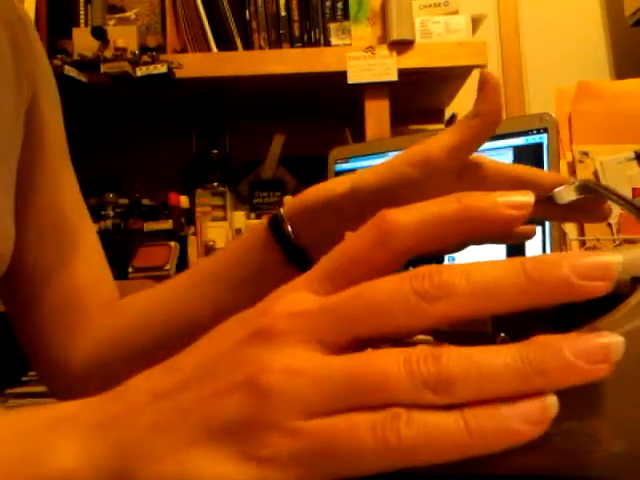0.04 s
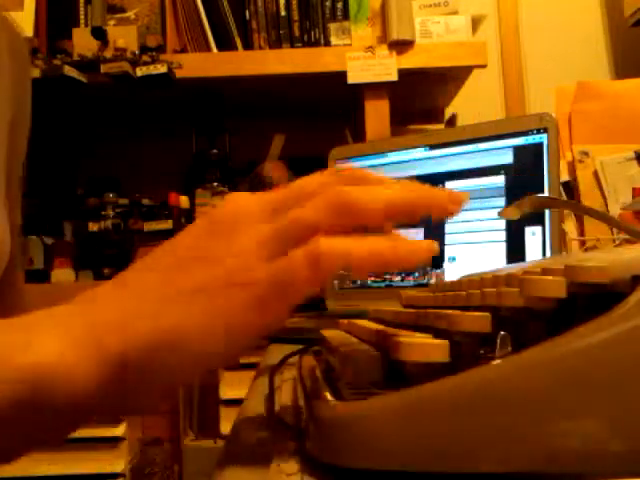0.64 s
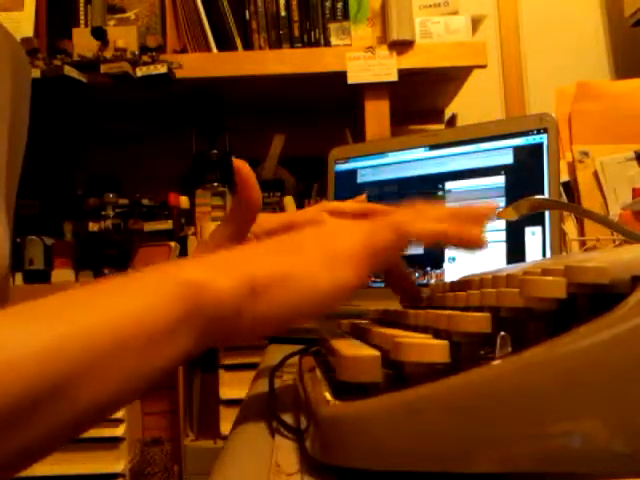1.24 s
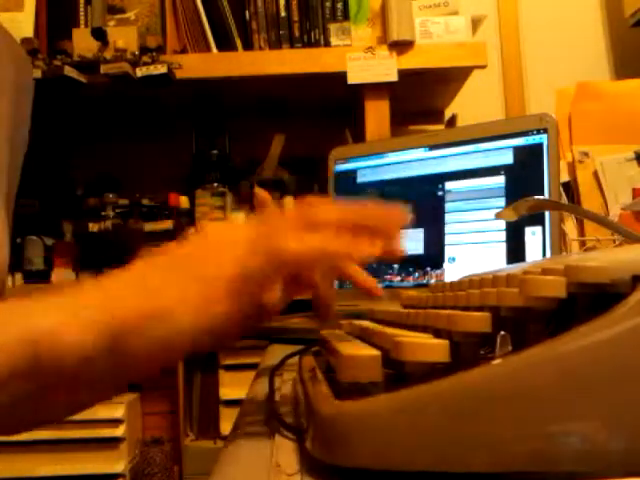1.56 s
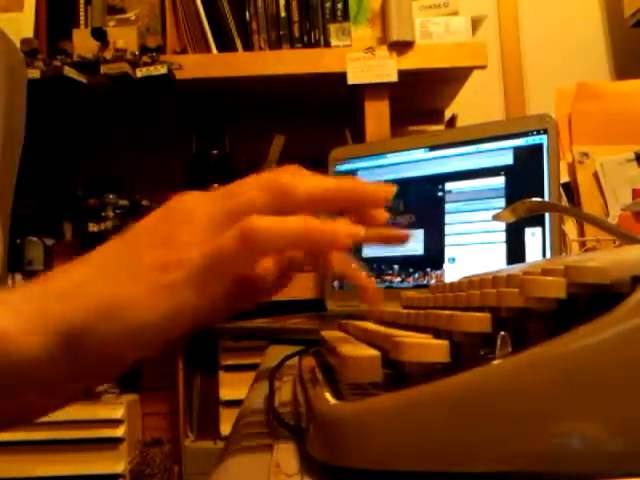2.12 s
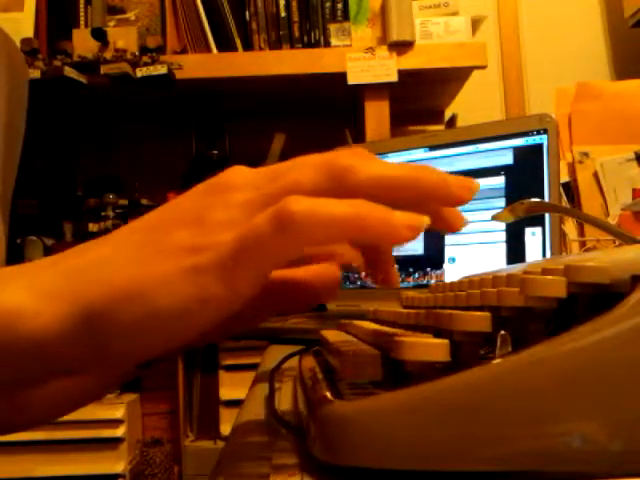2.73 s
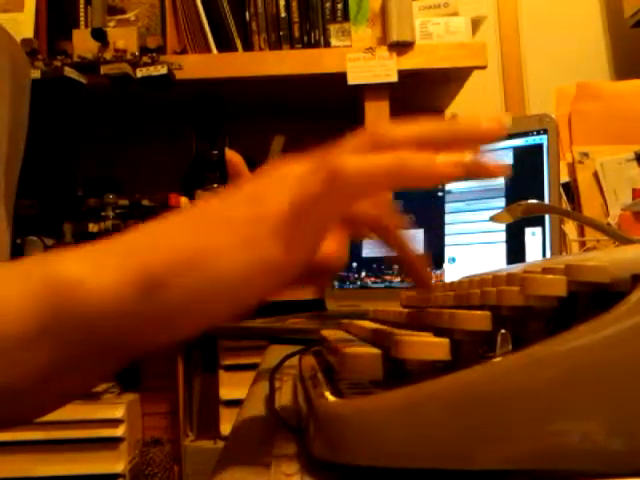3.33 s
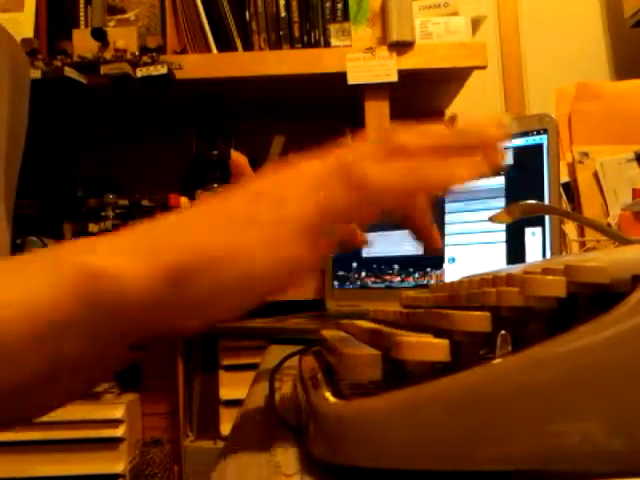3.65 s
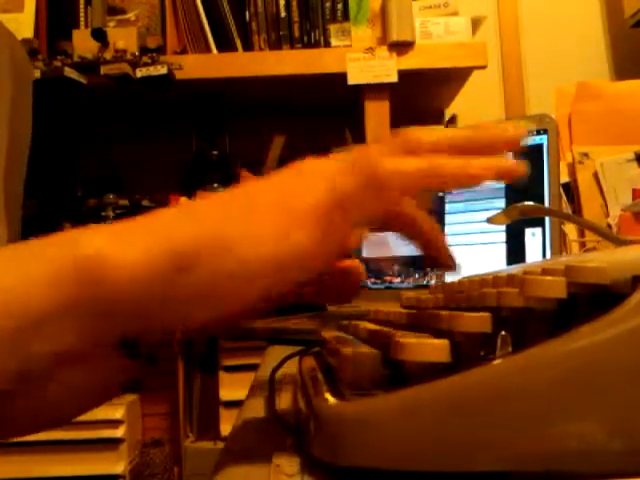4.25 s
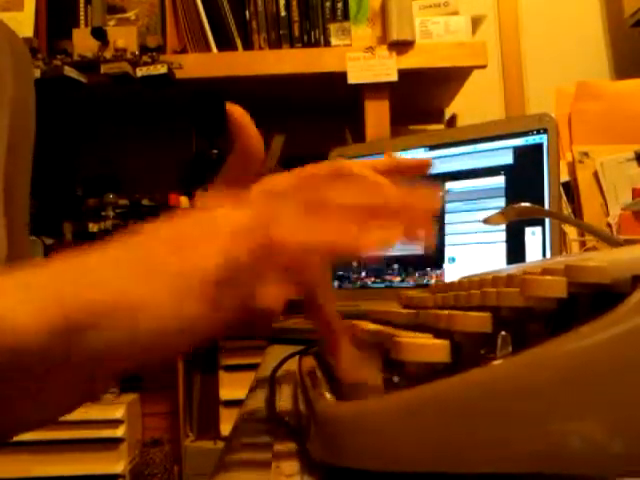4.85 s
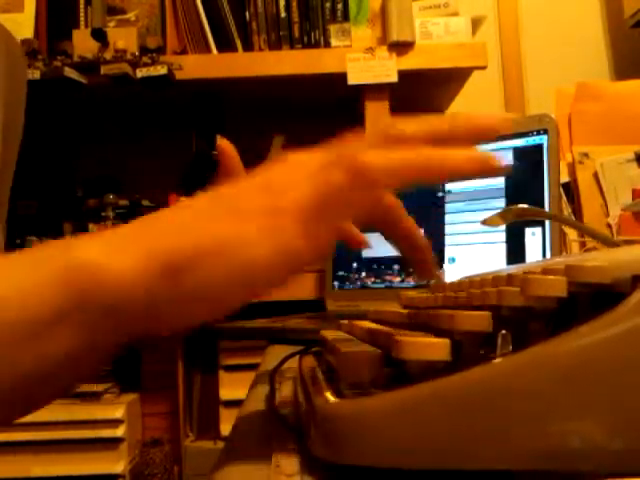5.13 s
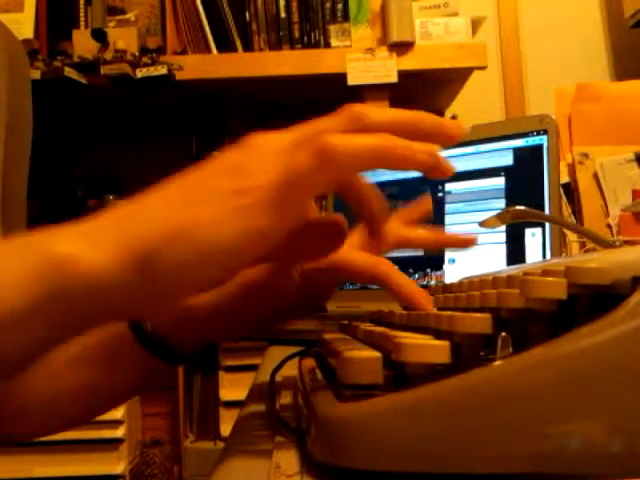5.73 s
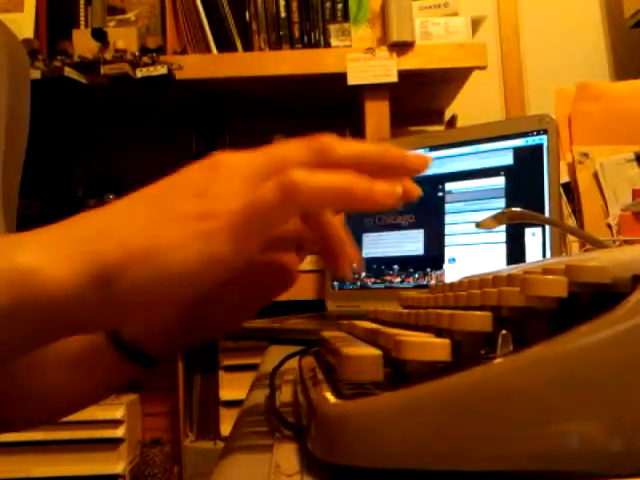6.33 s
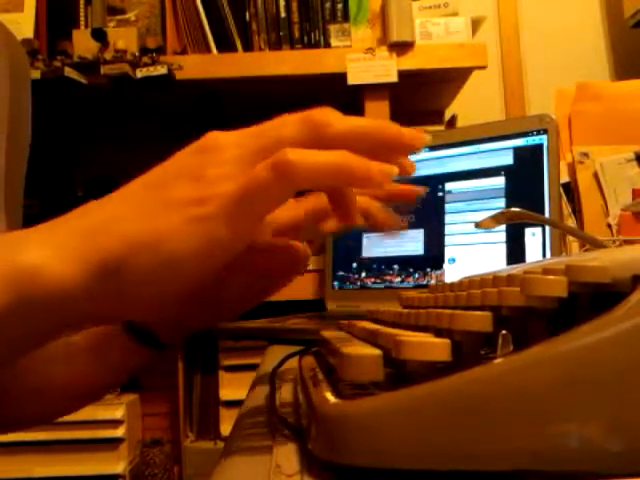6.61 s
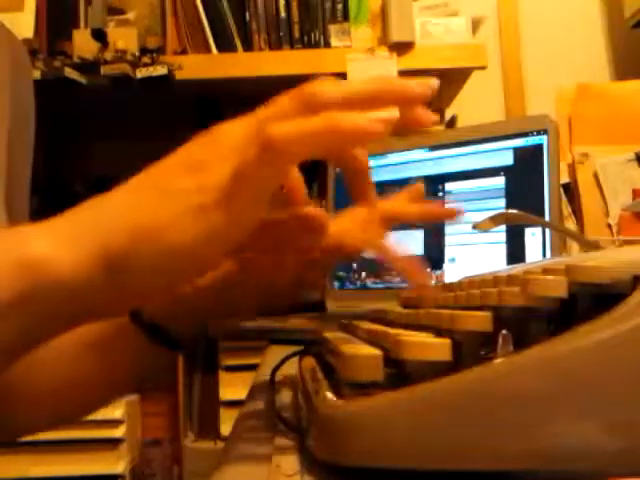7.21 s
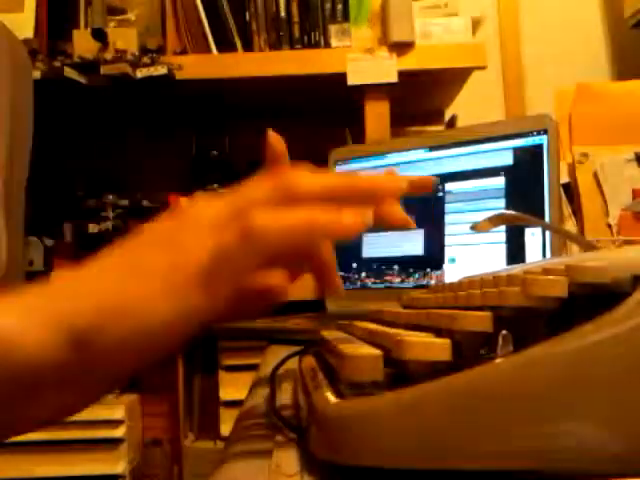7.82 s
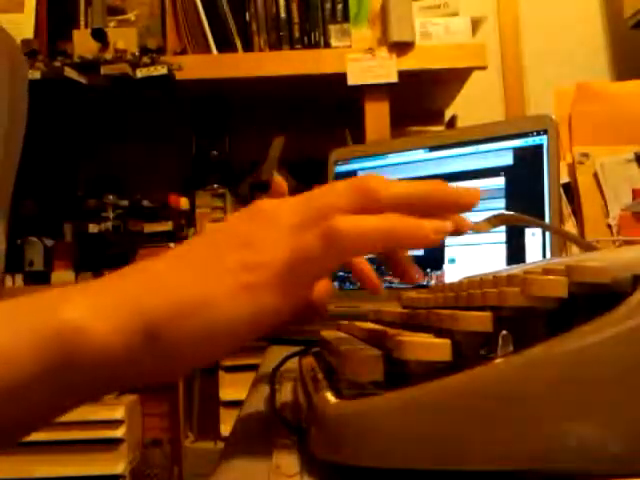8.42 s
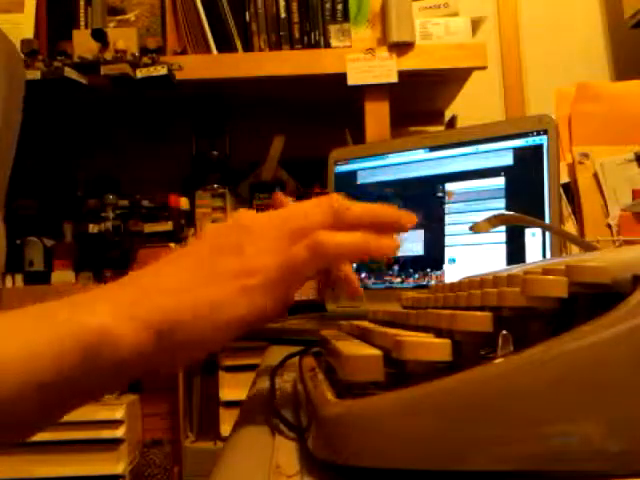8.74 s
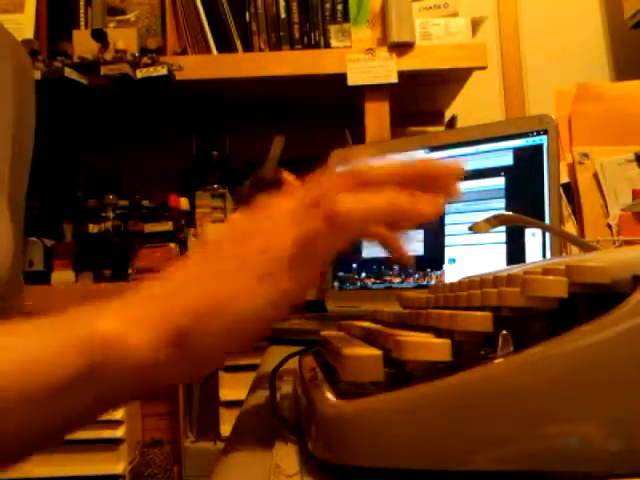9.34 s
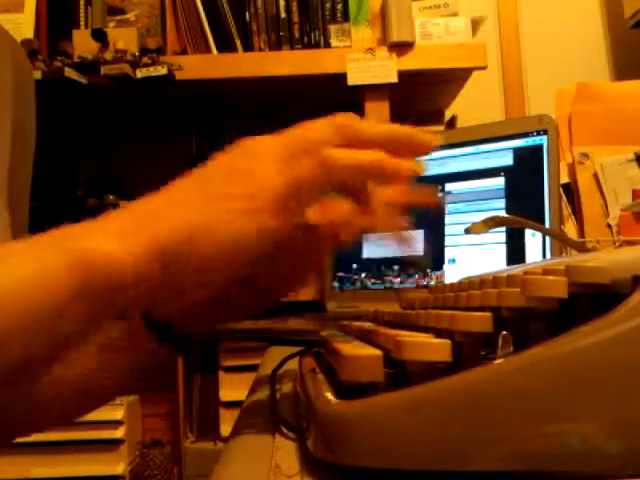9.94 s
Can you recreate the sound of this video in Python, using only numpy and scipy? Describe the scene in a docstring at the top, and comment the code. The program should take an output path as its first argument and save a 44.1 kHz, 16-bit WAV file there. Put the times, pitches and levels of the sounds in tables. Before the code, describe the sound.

Close typing on a manual typewriter: sharp metallic slaps, rattling keys and soft desk thuds, broken by short pauses.

```python
"""Manual typewriter on a desk, close up.

Bursts of typing in a small room. Per letter: the key rattles the linkage, the typebar slaps the platen
and rings the frame, then drops back on its rest. The space bar knocks and trips the escapement.
The desk thuds below, over steady rumble and hiss. The loudest slaps clip."""
import sys
import numpy as np
from scipy import signal
from scipy.fft import rfft, irfft
from scipy.io import wavfile

SR = 44100
rng = np.random.default_rng(int(sys.argv[2]) if len(sys.argv) > 2 else 0)


def store_wav(level_fs):
    """Save 16-bit WAV to argv[1]."""
    pcm = np.round(np.clip(np.atleast_2d(level_fs), -1, 1) * 32767)
    wavfile.write(sys.argv[1], SR, pcm.T.astype(np.int16))


N = 439655
T = np.arange(SR // 2) / SR  # time since contact, s

# space bar strokes: trip_s, trip_db, release_s, thump_hz
SPACES = [(1.6394, -9.5, 1.7305, 91.5), (2.2785, -8, 2.38, 142), (4.805, -7.5, 4.896, 69),
          (5.553, -9, 5.654, 151), (6.178, -8, 6.279, 218), (7.958, -7.5, 8.056, 63.2)]
# hands nudging the carriage: start_s, level_db
NUDGES = [(0.1995, -22), (0.3773, -13), (0.401, -16), (0.4577, -22)]
# tones of springs and steel bars: pitch_hz, level_db
STEEL_MODES = [(2708, -50), (4264, -37), (5867, -32), (6855, -51), (7267, -34.5), (7729, -36.5),
               (8374, -31)]
# spectrum of parts falling back to rest: freq_hz, level_db
RETURN_SPECTRUM = [(200, -3.5), (500, -14), (950, -2), (2800, -8.5), (4200, -11.5), (7300, -8.5),
                   (10000, -12), (14500, -23.5)]


def slaps(strikes, level_db=3, lag_s=0.0011, t60_s=0.045, bounce_s=0.011, bounce_db=-9):
    """Type hits the platen: a hard crack and two small bounces."""
    # crack spectrum: freq_hz, level_db
    spectrum = [(450, -14.5), (1000, -6.5), (1900, -9), (2900, 0), (3600, -3.5), (4400, 1), (5100, -6),
                (7300, 2), (9500, -5), (14500, -20)]
    out = np.zeros((2, N))
    bounces = amp(bounce_db) * np.hypot(fade(0.048, bounce_s), 0.5 * fade(0.048, 2 * bounce_s))
    envelope = np.hypot(fade(t60_s), bounces)
    for s, db in strikes:
        add(out, s + lag_s, amp(db + level_db) * envelope * noise())
    return colour(out, spectrum)


def frame(strikes, wash_db=-6, wash_t60_s=0.34, tones_db=-12, tones_t60_s=0.15, rise_s=0.00088):
    """The struck frame rings: a wash of dense modes plus a few clear steel tones."""
    # dense frame modes: freq_hz, level_db
    spectrum = [(240, -31.5), (400, -11.5), (1880, -10), (2700, -3), (3830, -6), (4390, -1.5), (5190, -5.5),
                (7470, 2), (13500, -14), (15000, -38)]
    wash, tones = np.zeros((2, 2, N))
    ring = noise() * fade(wash_t60_s)
    hz, mode_db = np.transpose(STEEL_MODES)
    modes = phasors(hz) * fade(tones_t60_s)
    weight = amp(mode_db) / np.linalg.norm(amp(mode_db))
    for s, db in strikes:
        onset = amp(db) * attack(rise_s)
        add(wash, s, onset * ring)
        re, im = rng.standard_normal((2, 2, len(hz)))
        add(tones, s, onset * (((re + 1j * im) * weight) @ modes).real)
    return amp(wash_db) * colour(wash, spectrum) + amp(tones_db) * tones


def keys(presses, level_db=-3.5, rise_s=0.0073, swing_db=-5.5, swing_s=0.036):
    """Levers take up slack, then clatter again as the bar pushes the ribbon lift."""
    # linkage spectrum: freq_hz, level_db
    spectrum = [(180, -35), (300, -11), (507, -11), (1150, -1), (1650, -7), (2400, -2.5), (3170, -6.5),
                (6840, -0.5), (13200, -7.5), (15000, -18.5)]
    out = np.zeros((2, N))
    take_up = fade(0.14) * attack(rise_s)
    push = np.hypot(take_up, amp(swing_db) * fade(0.079, swing_s))
    for s, db in presses:
        links = rattle(per_s=1100, t60_s=0.011, spread_db=2)
        add(out, s, amp(db + level_db) * push * links * noise())
    return shell_ring(colour(out, spectrum))


def shell_ring(x, ring_db=-7, t60_s=0.04):
    """Contacts plus the dense modes they ring in levers and shell."""
    return x + amp(ring_db) * convolve(x, noise() * fade(t60_s) * attack(0.00063))


def bar_returns(landings, knock_db=3, t60_s=0.024, rise_s=0.0014, clatter_db=-12, lead_s=0.0055):
    """Links catch and chatter; the bar lands on its padded rest, a hollow knock near its own pitch."""
    # typebar rest modes: pitch_hz, level_db
    rest_modes = [(830, -9), (1010, -2.5), (1180, -9), (1350, -3.5), (1660, -2), (1796, 1.5), (2150, -6)]
    hz, mode_db = np.transpose(rest_modes)
    knocks, clatter = np.zeros((2, 2, N))
    envelope = fade(t60_s) * (1 - np.exp(-(T / rise_s) ** 2))
    stereo_norm = np.sqrt(2) * np.linalg.norm(fade(t60_s))
    shake = np.hypot(amp(-1) * fade(0.045), fade(0.1, lead_s))
    for s, db, bar_hz in landings:
        weight = amp(mode_db) / (1 + (np.log(hz / bar_hz) / 0.58) ** 2)
        pitch_hz = hz * (1 + 0.02 * rng.standard_normal(len(hz)))
        phase = rng.uniform(0, 2 * np.pi, len(hz)) + 0.5 * rng.standard_normal((2, len(hz)))
        knock = ((weight * np.exp(1j * phase)) @ (envelope * phasors(pitch_hz))).real
        add(knocks, s, amp(db + knock_db) * stereo_norm * knock / np.linalg.norm(knock))
        links = rattle(per_s=990, t60_s=0.015, spread_db=3)
        add(clatter, s - lead_s, amp(clatter_db) * shake * links * noise())  # same level for every bar
    return knocks + colour(clatter, RETURN_SPECTRUM)


def space_bar(travel_s=0.026, down_db=-12, up_db=-17):
    """The bar knocks just before the escapement trips, and again on release."""
    # knock spectrum: freq_hz, level_db
    spectrum = [(200, 7), (950, 1), (2000, -2), (3200, -4), (5000, -4.5), (9000, -8), (14500, -28)]
    knocks = []
    for trip_s, _, release_s, _ in SPACES:
        knocks += [(trip_s - travel_s, down_db), (release_s, up_db)]
    return clicks(knocks, spectrum, level_db=-7, jingle_db=-4, jingle_t60_s=0.2)


def carriage(trips, resets, catch_s=0.0052):
    """The escapement pawl lets go, catches the next tooth, then resets; nudges click the carriage."""
    # snap spectrum: freq_hz, level_db
    spectrum = [(300, -8.5), (3000, -4), (4500, -0.5), (5900, -2), (8000, 1), (10500, -6.5), (14500, -12.5)]
    snaps = trips + [(s + catch_s, db) for s, db in trips]
    out = clicks(snaps, spectrum, level_db=-4, jingle_db=-13.5, jingle_t60_s=0.17)
    out += clicks(resets, RETURN_SPECTRUM, level_db=-8, jingle_db=1.5, jingle_t60_s=0.16)
    return out + clicks(NUDGES, spectrum, level_db=-0.5, jingle_db=-12.5, jingle_t60_s=0.16)


def small_parts(strikes, resets, jingle_s=0.085, jingle_db_per_s=-150):
    """Typebars ring and loose steel ticks after a hit; escapement, pawl and a spring ping."""
    bars = [(s, db, hz) for s, db in strikes for hz in rng.uniform(2600, 6200, size=3)]
    loose = [(s + late_s, db + jingle_db_per_s * late_s, rng.choice(STEEL_MODES)[0])
             for s, db in strikes for late_s in rng.uniform(0, jingle_s, size=5)]
    steps = [(s + 0.02, db, 7370) for s, db in strikes]
    pawl = [(s, db, 6900) for s, db in resets]
    spring = [(s, db, 3580) for s, db in NUDGES]
    out = pings(bars, level_db=-18, t60_s=0.1, detune=0.012)
    out += pings(loose, level_db=-10, t60_s=0.02)
    out += pings(steps, level_db=-11.5, t60_s=0.061)
    out += pings(pawl, level_db=-2, t60_s=0.02)
    return out + pings(spring, level_db=-24, t60_s=0.15, detune=0.01)


def thumps(level_db=-15, t60_s=0.16, rise_s=0.012):
    """The space bar bottoms out; the body booms at one low pitch."""
    out = np.zeros((2, N))
    envelope = amp(level_db) * fade(t60_s) * attack(rise_s)
    for s, _, _, hz in SPACES:
        add(out, s, envelope * np.sin(2 * np.pi * (hz * T + rng.random()))[None])
    return out


def desk(blows, level_db, tilt_db_per_oct, lag_s=0, rise_s=0.0045, mid_t60_s=0.24):
    """Blows pass through the feet into the desk, each favouring other modes; low modes last longest."""
    # desk modes: pitch_hz, level_db
    desk_modes = [(37.9, -1.5), (62.7, -6), (84.5, -1), (103, -2.5), (139.7, 2), (181.2, 2), (213.6, -1.5),
                  (261.3, 0.5), (382.7, -7)]
    hz, mode_db = np.transpose(desk_modes)
    out = np.zeros((2, N))
    envelopes = fade(mid_t60_s * np.sqrt(hz.mean() / hz)[:, None]) * attack(rise_s)
    tilted_db = mode_db + tilt_db_per_oct * np.log2(hz / hz.mean())
    for s, *_ in blows:
        weight = amp(level_db + tilted_db + rng.uniform(-3.6, 3, len(hz)))
        pitch_hz = hz * (1 + 0.02 * rng.standard_normal(len(hz)))
        turns = rng.random(len(hz)) + 0.089 * rng.standard_normal((2, len(hz)))
        thud = (weight * np.exp(2j * np.pi * turns)) @ (envelopes * phasors(pitch_hz))
        add(out, s + lag_s, thud.real)
    return out


def lever_rebounds():
    """An occasional key lever rebounds with a small knock."""
    # rebounds: start_s
    starts_s = [1.0, 2.143, 3.345, 3.431, 3.679]
    # knock spectrum: freq_hz, level_db
    spectrum = [(1500, 3), (9000, -23)]
    knocks = [(s, 0) for s in starts_s]
    return clicks(knocks, spectrum, level_db=-20.5, jingle_db=-14, jingle_t60_s=0.1, t60_s=0.03)


def squeaks():
    """Faint high squeaks in a pause of the typing."""
    # squeaks: start_s, pitch_hz
    events = [(8.609, 10900), (8.802, 9500), (8.88, 9900), (8.912, 9700)]
    return pings([(s, 0, hz) for s, hz in events], level_db=-39.5, t60_s=0.043, rise_s=0.0045)


def room(x, level_db=-14.5, gap_s=0.005):
    """Small furnished room: a diffuse tail, treble dying first."""
    # reverberation time: freq_hz, t60_s
    decay_times = [(200, 0.95), (800, 0.52), (3000, 0.17), (8000, 0.085)]
    hz, t, bins = signal.stft(noise() * (T > gap_s), SR, nperseg=256)
    decay = amp(-60 * t / curve(decay_times, hz)[:, None])
    _, tail = signal.istft(bins * decay, SR, nperseg=256)
    return amp(level_db) * convolve(x, tail)


def noise_floor(level_db=-42):
    """Steady rumble and hiss."""
    # background spectrum: freq_hz, level_db
    spectrum = [(12, -33.5), (20, -3), (108, -4.5), (229, -8), (294, -5), (445, -18), (603, -16),
                (914, -19.5), (1000, -23.5), (7300, -34.5), (9900, -31), (15000, -40)]
    return amp(level_db) * colour(noise(N), spectrum, size=16384)


def clicks(contacts, spectrum, level_db, jingle_db, jingle_t60_s, t60_s=0.02):
    """Short contacts, each with a jingle of loose parts. Rows: start_s, level_db."""
    out = np.zeros((2, N))
    for s, db in contacts:
        jingle = amp(jingle_db) * fade(jingle_t60_s) * rattle(per_s=450, t60_s=0.016, spread_db=3)
        add(out, s, amp(db + level_db) * np.hypot(fade(t60_s), jingle) * noise())
    return colour(out, spectrum)


def pings(events, level_db, t60_s, rise_s=0.0003, detune=0.033):
    """Three close, beating modes per event. Rows: start_s, level_db, pitch_hz."""
    out = np.zeros((2, N))
    envelope = fade(t60_s) * attack(rise_s)
    for s, db, hz in events:
        pitch_hz = hz * (1 + detune * rng.standard_normal((3, 1)))
        turns = pitch_hz * T + rng.random((2, 3, 1))
        add(out, s, amp(db + level_db) * envelope * np.sin(2 * np.pi * turns).sum(1))
    return out


def rattle(per_s, t60_s, spread_db):
    """Envelope of many small random contacts; mean power 1."""
    hits = (rng.random(len(T)) < per_s / SR) * amp(spread_db * rng.standard_normal(len(T))) ** 2
    power = signal.lfilter([1], [1, -amp(-120 / (t60_s * SR))], hits)
    return np.sqrt(power / (power.mean() + 1e-12))


def noise(size=len(T)):
    """Stereo white noise: alike in the bass, unrelated in the treble."""
    # left-right likeness: freq_hz, correlation
    likeness = [(100, 0.89), (1100, 0.72), (2200, 0.012)]
    left, other = rfft(rng.standard_normal((2, size)))
    correlation = curve(likeness, np.fft.rfftfreq(size, 1 / SR))
    right = correlation * left + np.sqrt(1 - correlation ** 2) * other
    return irfft(np.array([left, right]), size)


def colour(x, spectrum, size=4096):
    """Minimum-phase filter of unit energy, shaped to the spectrum."""
    log_gain = np.log(amp(curve(spectrum, abs(np.fft.fftfreq(size, 1 / SR)))) + 1e-5)
    taps = np.fft.ifft(np.exp(np.conj(signal.hilbert(log_gain)))).real
    return convolve(x, taps[None])


def convolve(x, response):
    """Apply a response scaled to unit energy in its first channel."""
    return signal.oaconvolve(x, response / np.linalg.norm(response[0]), axes=1)[:, :N]


def amp(db):
    return 10 ** (np.asarray(db) / 20)


def curve(points, hz):
    """Interpolate on a log-frequency axis."""
    freq_hz, value = np.transpose(points)
    return np.interp(np.log(hz + 1), np.log(freq_hz + 1), value)


def add(mix, start_s, sound):
    part = mix[:, max(round(start_s * SR), 0):][:, :sound.shape[1]]
    part += sound[:, :part.shape[1]]


def attack(rise_s):
    return 1 - np.exp(-T / rise_s)


def fade(t60_s, delay_s=0):
    return amp(-60 * np.maximum(T - delay_s, 0) / t60_s) * (T >= delay_s)


def phasors(hz):
    return np.exp(2j * np.pi * hz[:, None] * T)


def scene(reset_lag_s=0.012, reset_db=-20):
    """Typewriter, desk, room and background."""
    # letter strokes: press_s, press_db, strike_s, strike_db, landing_s, landing_db, bar_hz
    letters = [(0.839, -7, .896, -3, 1.046, -13, 1600), (1.030, -5, 1.065, -3, 1.172, -12, 1660),
               (1.225, -4.5, 1.2695, -2, 1.396, -7.5, 1650), (2.004, -4.5, 2.056, -2, 2.193, -16.5, 1810),
               (2.972, -5, 3.0263, -4, 3.139, -8.5, 1210), (3.223, -2.5, 3.273, -4.5, 3.381, -15, 950),
               (3.558, -4, 3.6044, -2, 3.710, -15.5, 1300), (3.872, -4, 3.9243, -4, 4.03, -15, 1140),
               (4.121, -4, 4.1686, -2.5, 4.288, -14.5, 1160), (4.309, -7, 4.356, -4.5, 4.472, -13, 1140),
               (4.452, -7.5, 4.4947, -3, 4.607, -13, 1450),
               (4.586, -11.5, 4.6302, -2.5, 4.752, -10.5, 1820), (5.057, -1, 5.101, -2, 5.216, -15.5, 1120),
               (5.31, -3, 5.3583, -2, 5.466, -12, 1380), (5.686, -5.5, 5.7345, -3.5, 5.865, -11, 1100),
               (5.84, -8, 5.8825, -1.5, 5.998, -16.5, 1320), (6.012, -5, 6.06, -3.5, 6.184, -9, 1620),
               (6.404, -6, 6.4533, -2, 6.577, -9.5, 1850), (6.71, -1, 6.752, -2, 6.878, -8.5, 1680),
               (6.983, -2, 7.0298, -2, 7.137, -12.5, 1620), (7.137, -5.5, 7.187, -1, 7.312, -11.5, 1430),
               (7.424, -5, 7.4715, -2, 7.593, -8.5, 1560), (7.660, -2, 7.704, -1.5, 7.823, -12.5, 1900),
               (9.187, -6, 9.239, -2.5, 9.38, -13, 1170), (9.444, -2.5, 9.488, -2.5, 9.594, -14.5, 1550),
               (9.586, -14, 9.6297, -5.5, 9.743, -7, 1500), (9.726, -4, 9.771, -2, 9.877, -17, 1320),
               (9.853, -9, 9.879, -2.5, 10, -9, 1300)]
    presses = [row[:2] for row in letters]
    strikes = [row[2:4] for row in letters]
    landings = [row[4:] for row in letters]
    trips = [row[:2] for row in SPACES]
    resets = [(release_s + reset_lag_s, reset_db) for _, _, release_s, _ in SPACES]
    machine = keys(presses) + slaps(strikes) + frame(strikes) + small_parts(strikes, resets) + squeaks()
    returns = bar_returns(landings)  # deep in the shell: less reaches the room
    machine += space_bar() + lever_rebounds() + carriage(trips, resets)
    thuds = thumps() + desk(presses, level_db=-31, tilt_db_per_oct=-0.5, lag_s=0.004)
    thuds += desk(strikes, level_db=-31.5, tilt_db_per_oct=7, lag_s=0.00096)
    thuds += desk(strikes, level_db=-30.5, tilt_db_per_oct=-3, lag_s=0.028)  # carriage lurches a step
    thuds += desk(landings, level_db=-34, tilt_db_per_oct=-3)
    thuds += desk(trips + resets, level_db=-29, tilt_db_per_oct=-1.5)
    thuds += desk(NUDGES[:1], level_db=-35.5, tilt_db_per_oct=-4)  # hands settle
    return machine + returns + thuds + noise_floor() + room(machine + 0.5 * returns)


def record(dry, ceiling=0.95, cutoff_hz=14900):
    """Colour each microphone, clip the peaks, low-pass."""
    # microphone balance: freq_hz, left_minus_right_db
    balance = [(40, 5.5), (400, 1.5), (1100, 0), (2000, -2), (5500, -0.5), (7200, 4), (12000, -4.5)]
    lean_db = curve(balance, np.fft.rfftfreq(N, 1 / SR)) / 2
    coloured = irfft(rfft(dry) * amp([lean_db, -lean_db]), N)
    clipped = np.clip(coloured, -ceiling, ceiling)
    low_pass = signal.firwin(401, cutoff_hz, window=("kaiser", 8), fs=SR)
    return np.clip(signal.oaconvolve(clipped, low_pass[None], "same", axes=1), -1, 1)


dry = scene()
out = record(dry)
store_wav(out)
```